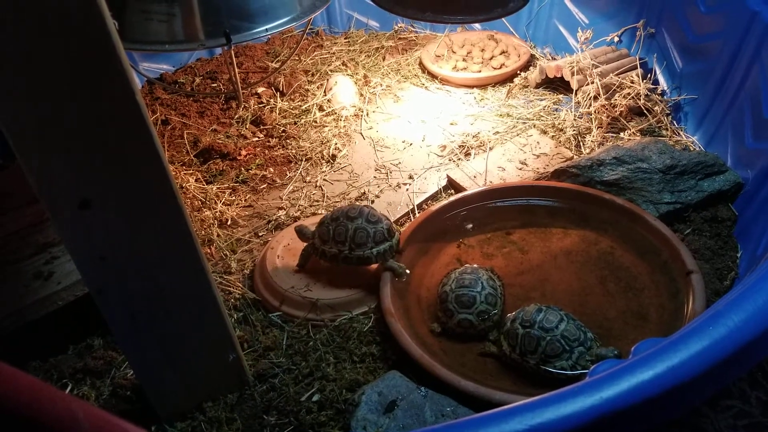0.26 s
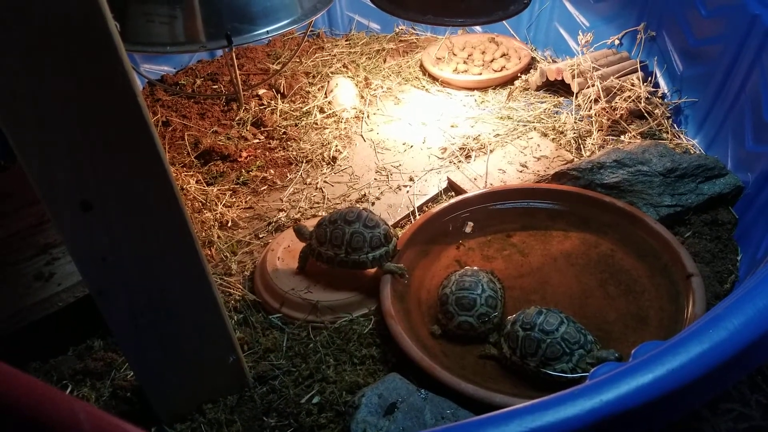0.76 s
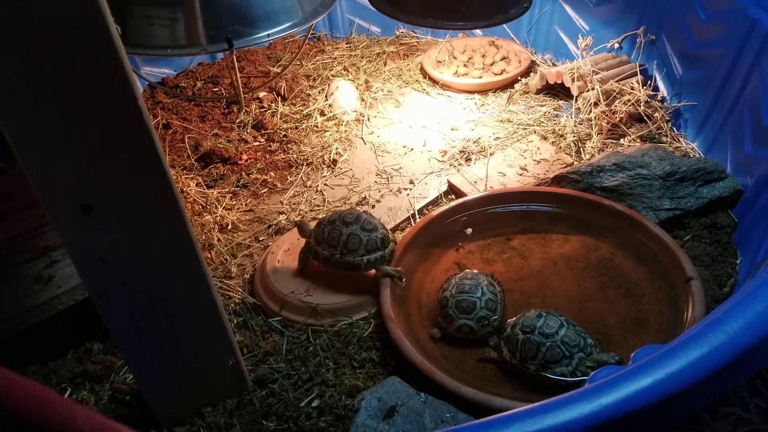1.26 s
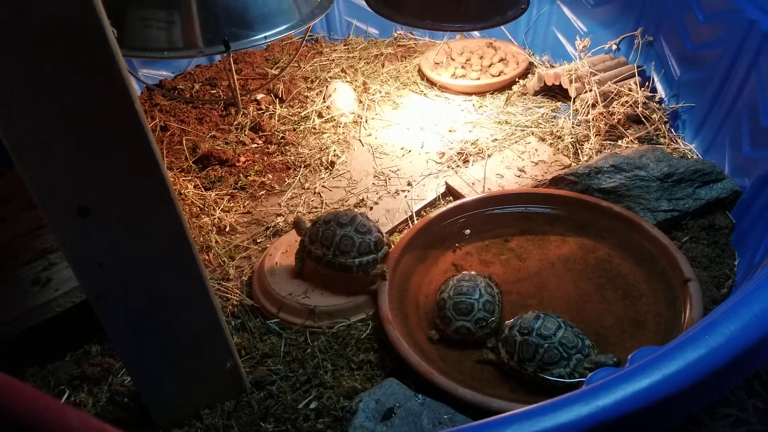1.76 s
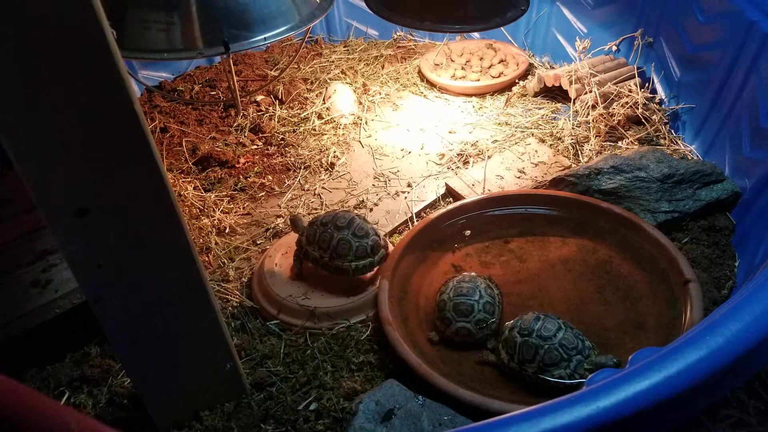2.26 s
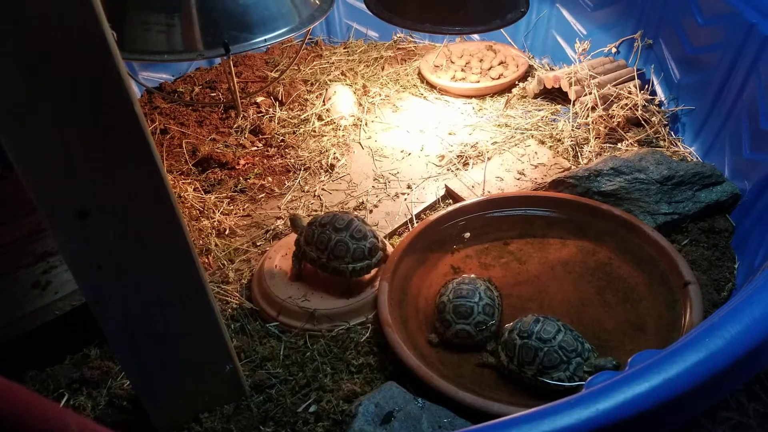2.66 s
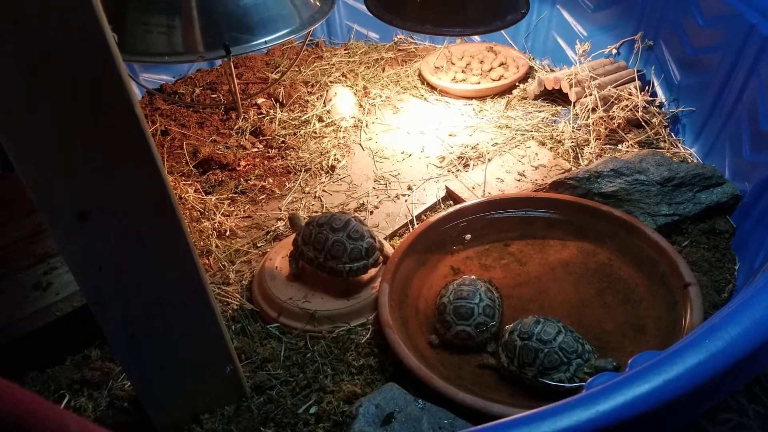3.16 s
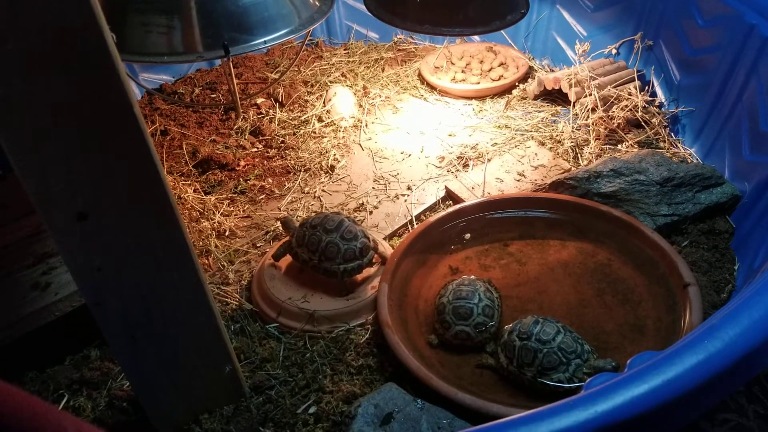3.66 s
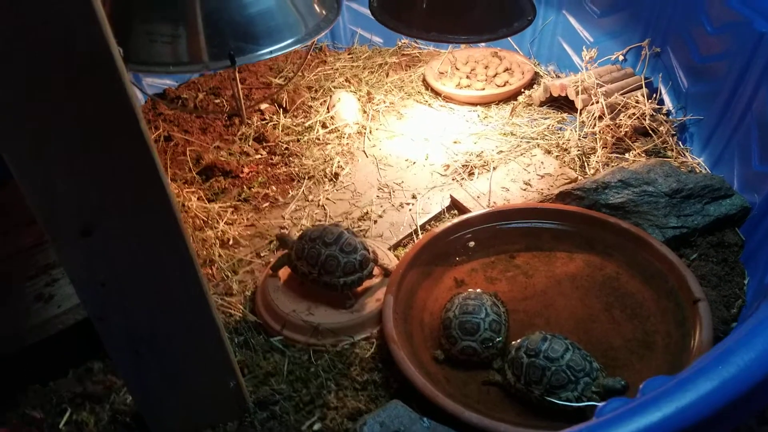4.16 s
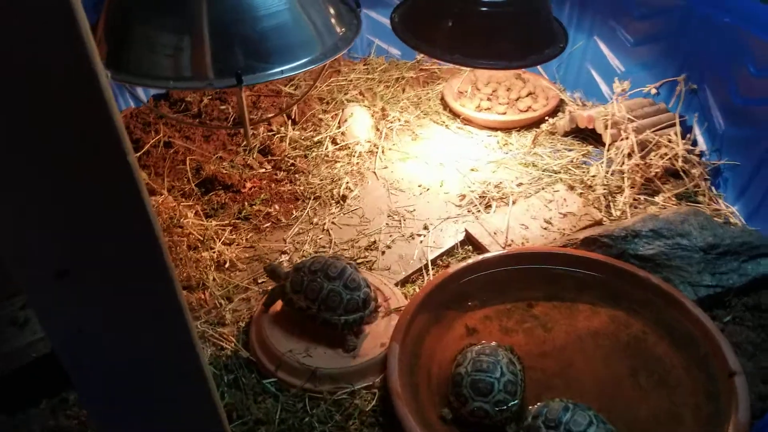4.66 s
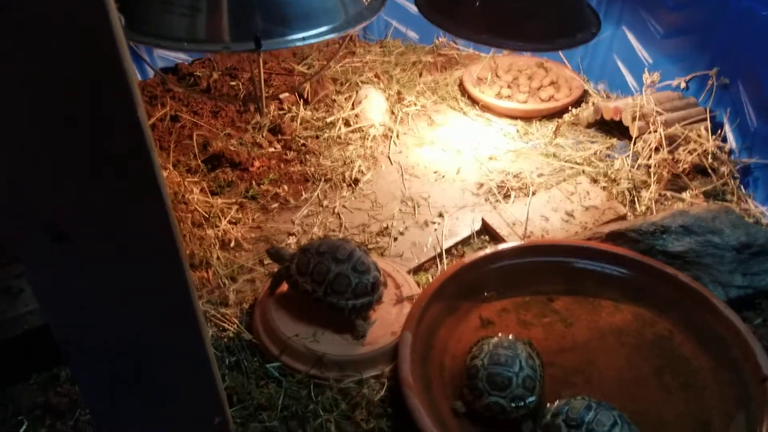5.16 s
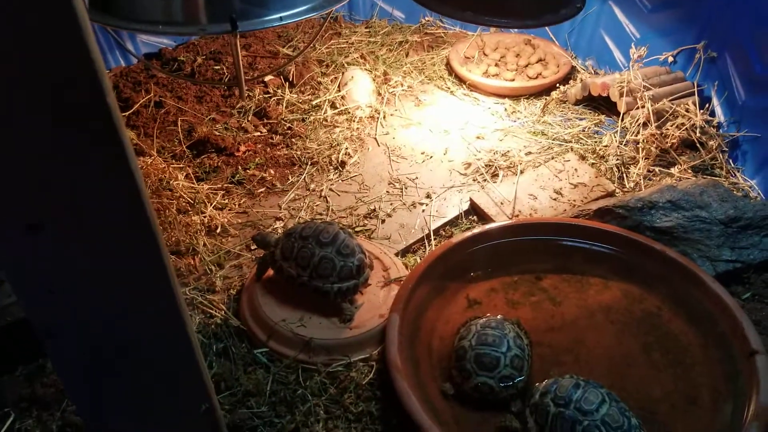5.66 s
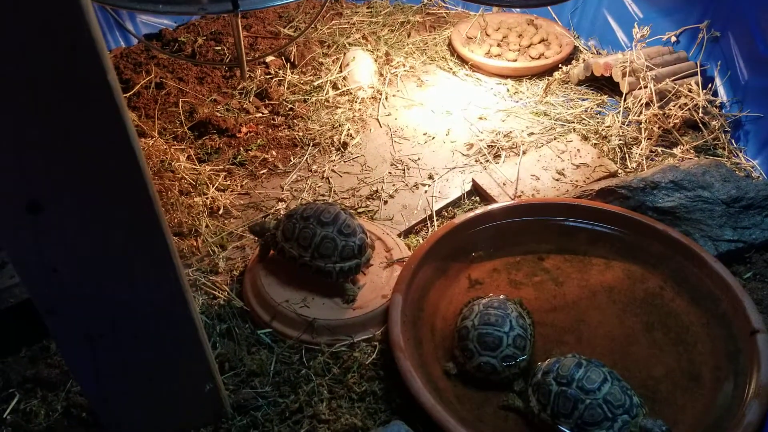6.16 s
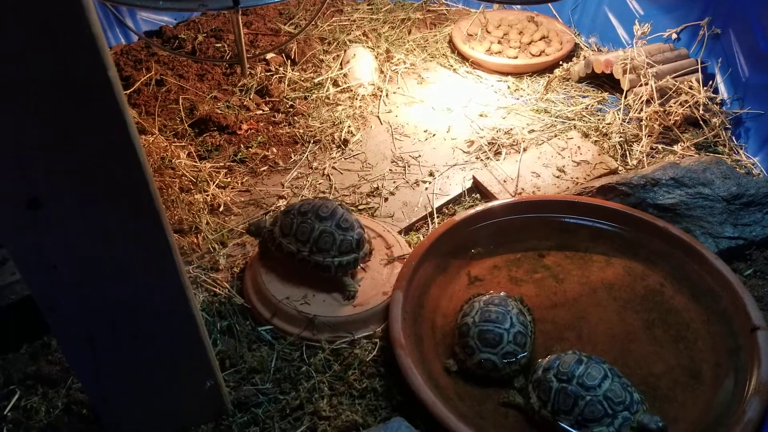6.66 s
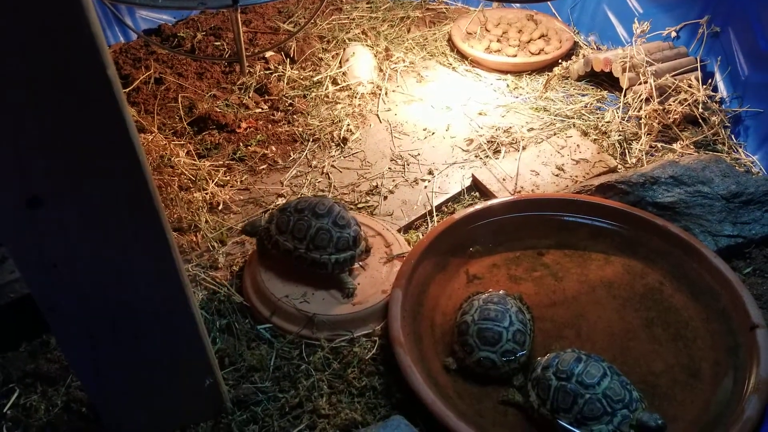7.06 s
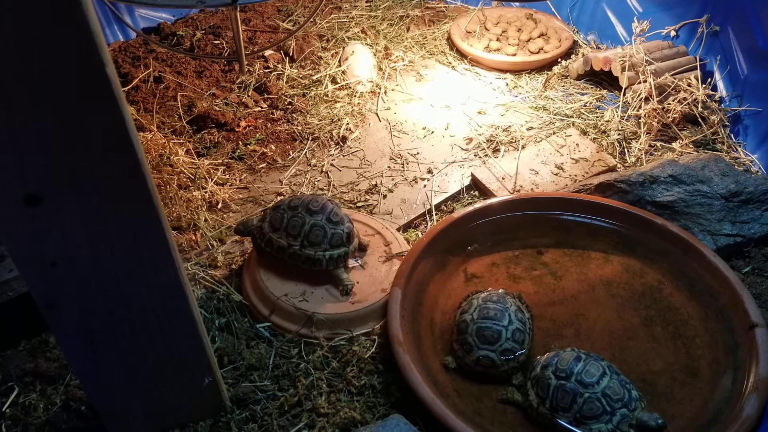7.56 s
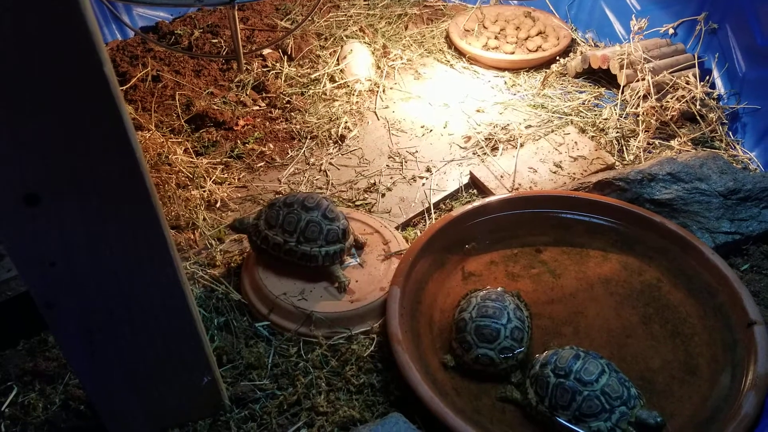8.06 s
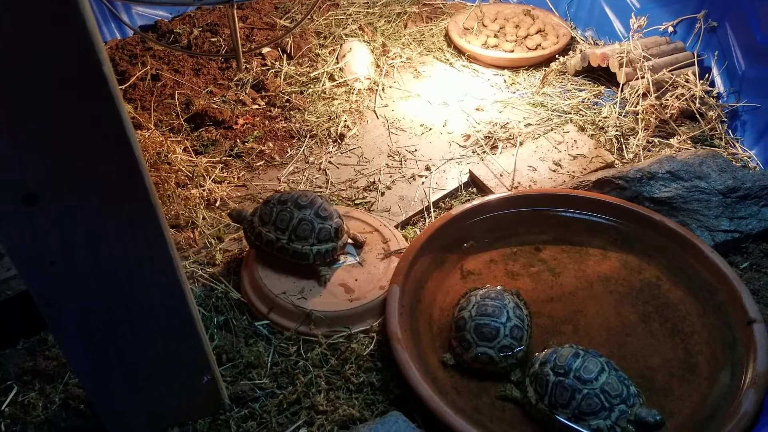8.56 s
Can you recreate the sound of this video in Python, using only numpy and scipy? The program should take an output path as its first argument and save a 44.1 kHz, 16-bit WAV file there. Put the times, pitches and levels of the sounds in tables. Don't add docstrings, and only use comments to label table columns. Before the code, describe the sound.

Close stereo sound of a small indoor animal enclosure, leaning left. Light rustling comes first, then a hollow knock that repeats in shrinking, quickening bounces, crossed by a bright slap. A short lull follows before dull, weighty bumps thud on hollow boards in uneven groups. Stalks snap and squeak halfway, straw keeps brushing, and a last faint squeak comes near the end over soft rumble and hiss.

```python
import sys
import numpy as np
from scipy import signal
from scipy.fft import rfft, irfft, next_fast_len
from scipy.io import wavfile
from scipy.ndimage import uniform_filter1d

SR = 44100
rng = np.random.default_rng(int(sys.argv[2]) if len(sys.argv) > 2 else 0)


def natural_amplitude(level_db):
    exponent = np.asarray(level_db, float) / 20
    return 10 ** exponent


def unload_wav(signal):
    wavfile.write(
        sys.argv[1],
        SR,
        np.round(np.clip(np.atleast_2d(signal).T, -1, 1) * 32767).astype(np.int16),
    )


N = 388554
T = np.arange(N) / SR

# start_s, thud_peak_db, low_air_db, dull_air_db, clear_air_db, bright_air_db
BOUNCES = [
    (0.685, -9.5, -27, -27, -26.5, -45.5),
    (1.479, -13.5, -31.5, -35, -38, -58),
    (2.054, -16.5, -30, -33.5, -47, -78),
    (2.439, -27.5, -39, -35.5, -52, -82),
    (2.758, -25, -43, -47, -79, -85.5),
    (3.006, -25.5, -44.5, -48, -70.5, -74.5),
    (3.198, -27.5, -44.5, -56.5, -92, -85),
    (3.344, -28.5, -47.5, -59.5, -91, -81),
    (3.452, -35.5, -56.5, -72, -81, -86),
    (3.526, -46.5, -84, -78, -90, -89.5),
]
# pitch_hz, level_db (per Hz)
BOUNCE_AIR = [(26, -43), (45, -20), (107, 0), (141, -7.5), (189, -7), (229, -2.5), (356, -10.5), (413, -20),
              (544, -8), (658, -20.5), (1190, -27), (1350, -32.5), (1530, -31.5), (2590, -58.5),
              (7000, -97), (9100, -108), (15400, -120)]
# pitch_hz, level_db (over the air around it), t60_s
SHELL = [(76, -10, 0.33), (110.2, -6.5, .3), (230, -5, 0.095), (534.6, -9.5, 0.36), (599.3, -6.5, .13),
         (707.5, -8.5, 0.16), (789, -11, 0.25), (1265, -13.5, 0.22), (1500, -11.5, .25)]
# pitch_hz, level_db, t60_s
RIM = [(2140, -67, .4), (2745, -67.5, 0.6)]
THUD_HZ, THUD_S = 142, 0.017

# start_s,
# peak_db, board_pitch_hz, push_s, boom_db, air_db
BUMPS = [(2.151, -34, 172, 0.056, -22.5, -33), (2.204, -29, 178, 0.018, -26.5, -41),
         (2.254, -30, 169, 0.034, -30.5, -44), (3.719, -50, 164, 0.022, -36.5, -68),
         (4.087, -18, 190.4, 0.05, -28, -32.5), (4.285, -23, 180.3, 0.05, -40.5, -39),
         (4.469, -24.5, 181.3, 0.06, -37.5, -43), (4.854, -25, 197.4, 0.056, -39.5, -40),
         (5.044, -19.5, 181.3, 0.05, -40, -35), (5.388, -22.5, 154, 0.034, -35, -36),
         (5.413, -27.5, 158.5, 0.05, -47.5, -38.5), (5.464, -35.5, 165, 0.097, -40, -53),
         (5.589, -20, 179.5, 0.034, -38, -34.5), (6.054, -27, 197.6, 0.034, -37, -40),
         (6.113, -36.5, 187, 0.041, -42, -54.5), (6.467, -17.5, 184, 0.05, -26, -27.5),
         (6.5, -35.5, 170.5, 0.065, -40.5, -37), (6.541, -23.5, 171.6, 0.039, -27.5, -46.5),
         (6.652, -24.5, 177.8, 0.05, -50, -44), (6.996, -14.5, 187.8, 0.037, -21, -28),
         (7.184, -20, 182.3, 0.05, -29, -34.5), (7.519, -16, 180, 0.05, -25, -27.5),
         (7.634, -33.5, 173.7, 0.054, -35, -45.5), (7.684, -21.5, 188.6, 0.026, -35.5, -36),
         (7.749, -40.5, 164, 0.02, -40.5, -47), (7.994, -28, 179.6, 0.05, -43, -42.5),
         (8.785, -36.5, 164, 0.12, -58, -48.5)]
# pitch_hz, level_db (per Hz)
BUMP_AIR = [(47, -32), (80, -14), (91, -19), (123, -13), (151, 1), (169, 0.5), (260, -16.5), (319, -18),
            (371, -29), (431, -19), (510, -28), (663, -34.5), (877, -40.5), (3440, -72.5), (7000, -80.5),
            (9100, -103), (15400, -120)]
# pitch_hz, level_db (relative to the board), t60_s
TUB = [(108.5, -9.5, 0.29), (244.7, -11, 0.04), (310.3, -22, 0.26), (442, -23, .2)]
# pitch_hz, level_db, t60_s
BOOM = [(60.96, 0, .45), (52.4, -15.5, 0.99), (68.8, -15, 0.18)]
BOARD_T60_S, BOARD_SAG = 0.06, 0.15

# pitch_hz, level_db (per Hz)
SLAP = [(240, -54), (400, -20), (536, -1), (644, -6.5), (1050, -9.5), (1390, -9), (1520, -13.5),
        (2560, -17), (3380, -24), (3940, -19), (6440, -21), (8490, -36.5), (12500, -34), (15700, -39.5)]
SLAP_S = 2.115

# start_s, rustle_db, extra_body_db (below 3 kHz)
STRAW = [
    [(0.0, -81.5, 8), (0.008, -87.5, 0), (0.358, -83.5, 4.5), (0.442, -73, 0.5), (0.51, -79, 1),
     (0.776, -80, 9), (0.866, -100, 2.5), (0.994, -91, -9), (1.02, -87.5, 4), (1.12, -81.5, -0.5)],
    [(1.4, -100, 2), (1.532, -81, 3), (1.694, -100, -12), (1.718, -81, 1.5), (1.818, -97, 2),
     (2.014, -95, 0), (2.05, -100, 7.5)],
    [(2.5, -84.5, 9), (2.55, -89, 3), (2.62, -79, -2), (2.73, -99, 1), (3.33, -91, 1.5), (3.53, -100, 4),
     (3.78, -82, -2), (3.99, -86, -4.5), (4.06, -82.5, 0.5), (4.1, -69.5, 3.5), (4.19, -70, 1),
     (4.45, -87, -4), (4.48, -84, 0), (4.5, -70, -11), (4.57, -78.5, -2), (4.59, -74.5, -11),
     (4.66, -71.5, 9.5), (4.68, -72, 2), (4.91, -81, -1), (5.36, -77.5, -4.5), (5.45, -70.5, -3),
     (5.79, -87, 0.5), (6.43, -89.5, 1), (6.52, -74, -2), (6.66, -87.5, 3), (6.79, -81, -2),
     (6.91, -97, -1.5), (7.03, -76, 0.5), (7.21, -89, 0), (7.25, -83.5, 1), (7.49, -100, -2),
     (7.54, -80, 1.5), (7.58, -77.5, 0), (7.95, -99, 1.5), (8.02, -88, -0.5), (8.28, -95, 6.5),
     (8.3, -84.5, 3), (8.49, -88, -4), (8.63, -77, -3.5), (8.79, -85, 8.5), (8.81, -73, 6)],
]
# pitch_hz, level_db (per Hz)
RUSTLE = [(280, -30), (480, 1), (886, -10.5), (1560, -10), (1810, -8.5), (2220, -7.5), (2480, -6),
          (3020, -12), (3590, -9.5), (3860, -7.5), (6790, -9), (9000, -33.5), (11700, -62.5), (19800, -120)]
# start_s, level_db, extra_body_db
SWISHES = [
    (1.148, -68, 5),
    (3.685, -80.5, 11.5),
    (4.09, -76.5, 2.5),
    (5.4, -69, 6),
    (8.27, -85, 11),
    (8.395, -80, 0.5),
]
# start_s, peak_db, ring_hz
TICKS = [(4.498, -55.5, 2020), (4.503, -65, 2020), (4.5052, -56, 2200), (4.5256, -53, 2070),
         (4.5922, -52, 4380), (4.6021, -50.5, 4470), (4.618, -57, 4700), (4.6478, -44, 4500),
         (4.6647, -56, 3640), (4.7042, -48.5, 2360), (4.7346, -58, 2510), (4.762, -55, 2540),
         (4.7654, -52, 2330), (4.7794, -55.5, 5100), (4.7928, -69, 4400), (5.575, -58.5, 3990)]
# start_s, level_db
SQUEAK = [
    [(4.65, -71), (4.75, -70.5), (4.812, -91), (4.82, -81)],
    [(8.49, -85), (8.52, -77.5), (8.564, -72), (8.6, -82), (8.626, -71.5), (8.71, -83), (8.77, -82)],
]
SQUEAK_HZ = 2470

# pitch_hz, level_db (per Hz)
HUSH = [(13, -40.5), (22, -12), (59, 3), (87, 0), (159, -9.5), (317, -21.5), (394, -32), (977, -40.5),
        (2360, -44), (3280, -52.5), (5090, -47), (6700, -53.5), (8340, -63), (12300, -42.5), (15700, -44.5)]
HUSH_DB = -53
# start_s, level_db
RUMBLE = [(0, -2.5), (.6, 0.5), (1.3, -3), (1.9, -3), (2.02, -4.5), (2.6, -1), (3.6, -4.5), (4.05, 0.5),
          (5.3, 2.5), (6, 0), (6.4, -0.5), (8.3, -4.5), (8.8, 0)]
# start_s, level_db
HISS = [(0.0, -87), (0.47, -79), (0.83, -85.5), (2.06, -87), (2.18, -86), (2.92, -87), (3.26, -84.5),
        (3.53, -86.5), (4.59, -82), (4.69, -79.5), (5.0, -82), (5.44, -76.5), (5.74, -84), (6.38, -83.5),
        (7.83, -86.5), (8.54, -85.5), (8.81, -80.5)]

# pitch_hz, t60_s
ROOM_T60 = [(45, 0.27), (110, 0.51), (280, 0.36), (740, 0.35), (2000, 0.37), (5000, 0.22), (12000, 0.26)]
# pitch_hz, left_right_correlation
LIKENESS = [(60, 0.91), (130, 0.98), (290, 0.86), (640, .52), (1410, -0.25), (3100, 0), (16000, 0.17)]
# pitch_hz, left_minus_right_db
LEAN = [(60, 2.5), (150, 3.5), (350, 3.5), (700, 4), (1300, 4.5), (2400, 5.4), (4800, 11), (6500, 10.5),
        (9000, 1), (13000, 2.5)]
LOW_CUT_HZ, TOP_HZ = 38, 15750


def on_log(table, hz):
    table_hz, value = np.transpose(table)
    return np.interp(np.log(np.maximum(hz, 1)), np.log(table_hz), value)


def add(out, x, start_s):
    i = int(start_s * SR)
    x = x[..., :N - i]
    out[:, i:i + x.shape[-1]] += x


def walk(rate_hz):
    hold = int(SR / rate_hz)
    steps = np.repeat(rng.standard_normal(N // hold + 1), hold)
    return 1.3 * uniform_filter1d(uniform_filter1d(steps, hold), hold)[:N]


def bands(spectrum, size):
    size_fft = next_fast_len(size)
    hz = np.fft.rfftfreq(size_fft, 1 / SR)
    alike = np.clip(on_log(LIKENESS, hz), -1, 1)
    mid, side = rfft(rng.standard_normal((2, size_fft))) * np.sqrt([1 + alike, 1 - alike])
    left_right = np.array([mid + side, mid - side])
    gain = natural_amplitude(on_log(spectrum, hz)) * (hz > spectrum[0][0]) * (hz < spectrum[-1][0])
    gain /= np.sqrt(2 * np.mean(gain ** 2))
    place = 2 * np.log2(np.maximum(hz, 1))
    heard = place[gain > 0]
    for k in range(int(heard[0]), int(heard[-1]) + 2):
        crossfade = np.clip(1 - abs(place - k), 0, 1)
        yield 2 ** (k / 2), irfft(left_right * crossfade * gain, size_fft)[:, :size]


def tail(spectrum, swell_s, first, attack_s, splits_hz=(), linger=1.0):
    t = T[:36000]
    out = np.zeros((len(splits_hz) + 1, 2, len(t)))
    for hz, sound in bands(spectrum, size=len(t)):
        fade = np.exp(-np.log(1000) * t / on_log(ROOM_T60, hz) / linger)
        out[np.searchsorted(splits_hz, hz)] += sound * fade
    attack = 1 - np.exp(-t / attack_s)
    swell = first + (1 - first) * (1 - np.exp(-t / swell_s)) ** 2
    return out * attack * swell


def ring(hz, rise_s, push_s, t60_s, sag=0.0):
    t = T[:int((push_s + t60_s) * SR)]
    bend = 1 + sag * (0.5 - np.clip(t / push_s, 0, 1))
    turns = np.cumsum(hz * bend) / SR
    grow = 1 - np.exp(-t / rise_s)
    fade = np.exp(-np.log(1000) * np.maximum(t - push_s, 0) / t60_s)
    return -np.sin(2 * np.pi * turns) * grow * fade


def bounces():
    out = np.zeros((2, N))
    slices_hz = 2 ** np.arange(4.5, 14.5, 0.5)
    splits_hz = slices_hz[:-1] * 2 ** 0.25
    usual = [(230, -6), (540, -6), (1150, -16), (2200, -36)]  # Hz, usual dB of low, dull, clear and bright air
    t = T[:int(THUD_S * SR)]
    thud = -np.sin(2 * np.pi * THUD_HZ * t) * np.sin(np.pi * t / THUD_S) ** 0.8

    same = tail(BOUNCE_AIR, 0.012, 0.17, 0.003, splits_hz)
    for hz, db, t60_s in SHELL:
        pair = ring(hz, 0.0059, 0.01, t60_s) + 0.31 * ring(1.012 * hz, 0.01, 0.01, t60_s)
        late = np.pad(pair, (600, 36000))[:same.shape[-1]]
        same[np.searchsorted(splits_hz, hz)] += natural_amplitude(db + on_log(usual, hz)) * late

    for start_s, thud_db, *air_db in BOUNCES:
        add(out, natural_amplitude(thud_db + 3) * thud, start_s + 0.0016)
        colour = [(hz, db - usual_db + 5) for (hz, usual_db), db in zip(usual, air_db)]
        own = tail(BOUNCE_AIR, 0.015, 0.4, 0.0033, splits_hz)
        answer = 0.8 * same + 0.47 * own
        add(out, np.tensordot(natural_amplitude(on_log(colour, slices_hz)), answer, axes=1), start_s)

    for hz, db, t60_s in RIM:
        pair = ring(hz, 0.02, 0.02, t60_s) + 0.5 * ring(0.91 * hz, 0.016, 0.02, t60_s)
        add(out, natural_amplitude(db) * pair, BOUNCES[0][0])
    return out


def bumps():
    out = np.zeros((2, N))
    for start_s, db, board_hz, push_s, boom_db, air_db in BUMPS:
        add(out, natural_amplitude(db) * ring(board_hz, 0.3 * push_s, push_s, BOARD_T60_S, BOARD_SAG), start_s)
        for hz, mode_db, t60_s in BOOM:
            detune = 1 + 0.043 * rng.standard_normal()
            boom = ring(hz * detune, 0.53 * push_s, push_s + 0.005, t60_s)
            add(out, natural_amplitude(boom_db + mode_db) * boom, start_s)
        for hz, mode_db, t60_s in TUB:
            detune = 1 + 0.04 * rng.standard_normal()
            luck_db = 0.97 * rng.standard_normal()
            tub = ring(hz * detune, 0.011, 0.6 * push_s, t60_s)
            add(out, natural_amplitude(db + mode_db + luck_db) * tub, start_s)
        low, air, edge = tail(BUMP_AIR, 0.56 * push_s, 0.1, 0.0058, splits_hz=(290, 900))
        edge_db = air_db + 17.5 + 0.58 * (air_db + 31.5)
        add(out, natural_amplitude(db - 2.5) * low + natural_amplitude(air_db + 19) * air + natural_amplitude(edge_db) * edge, start_s)
    return out


def slap():
    out = np.zeros((2, N))
    pen = tail(SLAP, 0.019, 0.39, 0.00083)[0]
    next_room = tail(SLAP, 0.042, 0.1, 0.002, linger=1.54)[0]
    add(out, natural_amplitude(-32) * pen + natural_amplitude(-39.5) * next_room, SLAP_S)
    return out


def rustle():
    start_s, *columns = np.vstack(STRAW).T
    rustle_db, body_db = (np.interp(T, start_s, column) for column in columns)
    out = np.zeros((2, N))
    for hz, sound in bands(RUSTLE, size=N):
        out += sound * natural_amplitude(walk(12) + (hz < 3000) * body_db)
    return out * natural_amplitude(rustle_db + 4)


def brushes():
    out = np.zeros((2, N))
    for start_s, db, extra_db in SWISHES:
        body, top = tail(RUSTLE, 0.02, 0.7, 0.002, splits_hz=(3000,), linger=2.0)
        add(out, natural_amplitude(db) * (top + natural_amplitude(extra_db) * body), start_s)
    return out


def ticks():
    out = np.zeros((2, N))
    t = T[:1500]
    stalk = signal.butter(3, [700, 6800], "bandpass", fs=SR, output="sos")
    for start_s, db, hz in TICKS:
        crack = np.exp(-t / 0.00055) + 0.078 * np.exp(-t / 0.0058)
        tick = rng.standard_normal((2, len(t))) * crack
        tick += 0.2 * np.sin(2 * np.pi * hz * t) * np.exp(-t / 0.0023)
        tick_db = db + 4.5 + 0.3 * (db + 45.5)
        add(out, natural_amplitude(tick_db) * signal.sosfilt(stalk, tick), start_s)
    add(out, natural_amplitude(-62.5) * ring(3650, 0.003, 0.012, 0.049), 4.652)
    return out


def squeak():
    shake = walk(150) + 1j * walk(150)
    flutter = np.real(shake * np.exp(2j * np.pi * SQUEAK_HZ * T))
    level = sum(natural_amplitude(np.interp(T, *np.transpose(rows), -200, -200)) for rows in SQUEAK)
    return flutter * level


def hush():
    out = np.zeros((2, N))
    rumble_db = np.interp(T, *np.transpose(RUMBLE))
    hiss_db = np.interp(T, *np.transpose(HISS)) + 84
    for hz, sound in bands(HUSH, size=N):
        out += sound * natural_amplitude((hz < 450) * (rumble_db + 2.5 * walk(7)) + (hz > 9000) * hiss_db)
    return out * natural_amplitude(HUSH_DB)


def scene():
    return bounces() + bumps() + slap() + rustle() + brushes() + ticks() + squeak() + hush()


def low_pass(x):
    return signal.sosfilt(signal.butter(12, 15970, fs=SR, output="sos"), x)


def record(dry):
    size = next_fast_len(N)
    hz = np.fft.rfftfreq(size, 1 / SR)
    lean_db = on_log(LEAN, hz) / 2
    ports = natural_amplitude(np.array([lean_db, -lean_db])) * (hz < TOP_HZ)
    mix = irfft(rfft(dry, size) * ports, size)[:, :N]
    low_cut = signal.butter(2, LOW_CUT_HZ, "highpass", fs=SR, output="sos")
    mix = signal.sosfilt(low_cut, mix)
    return low_pass(mix)


dry = scene()
out = record(dry)
unload_wav(out)
```